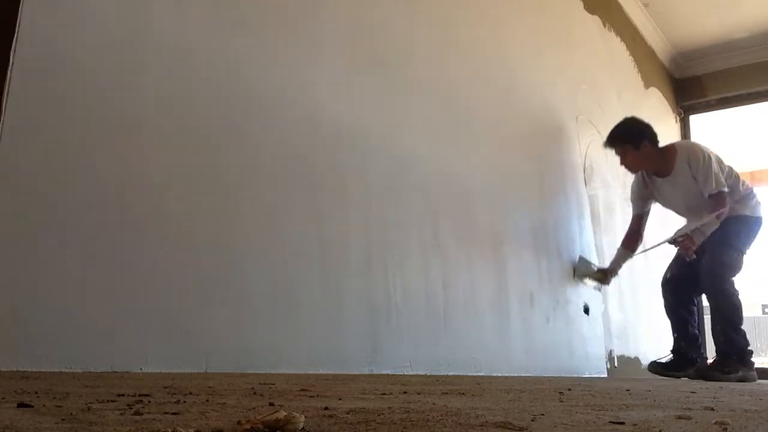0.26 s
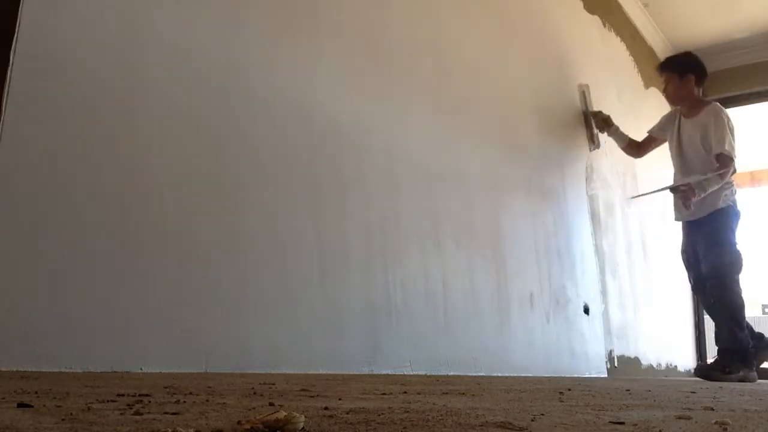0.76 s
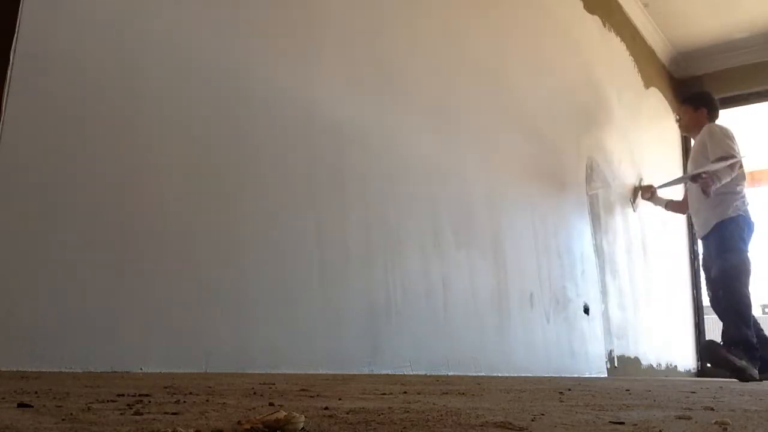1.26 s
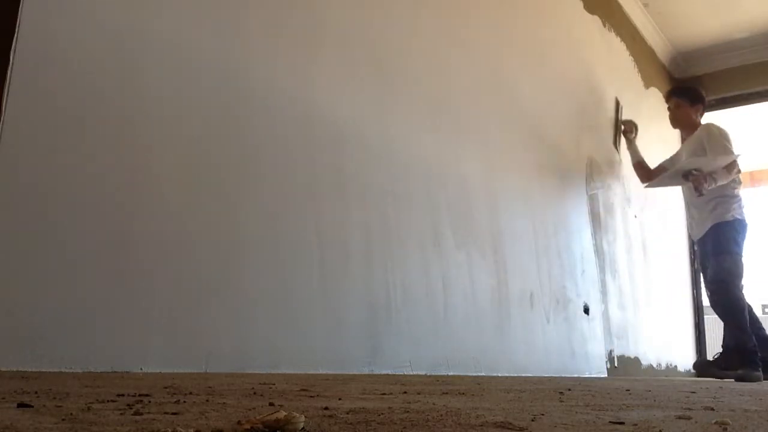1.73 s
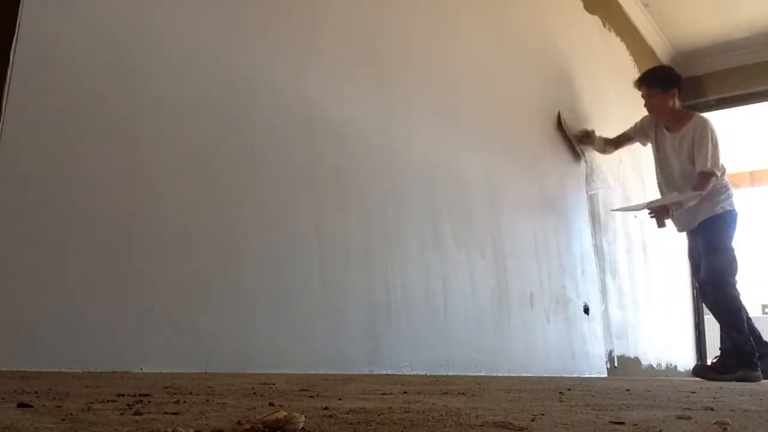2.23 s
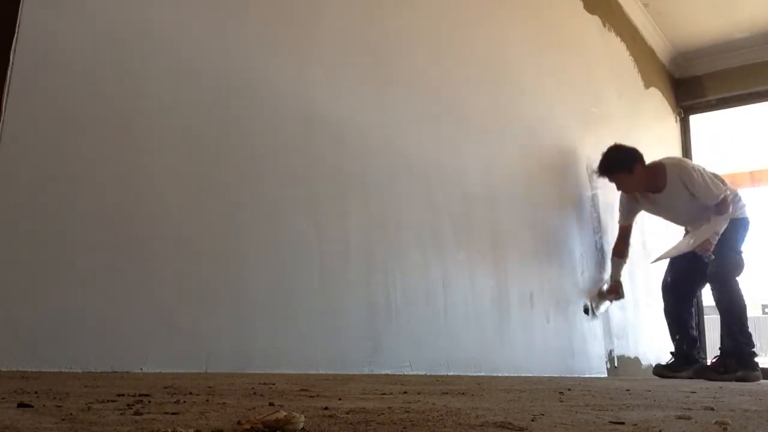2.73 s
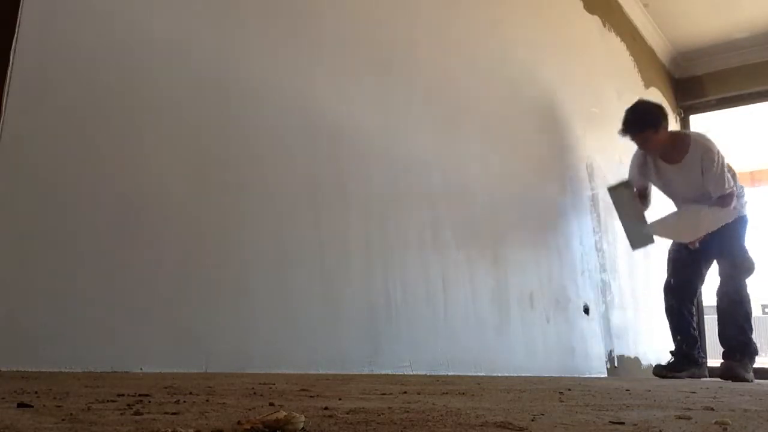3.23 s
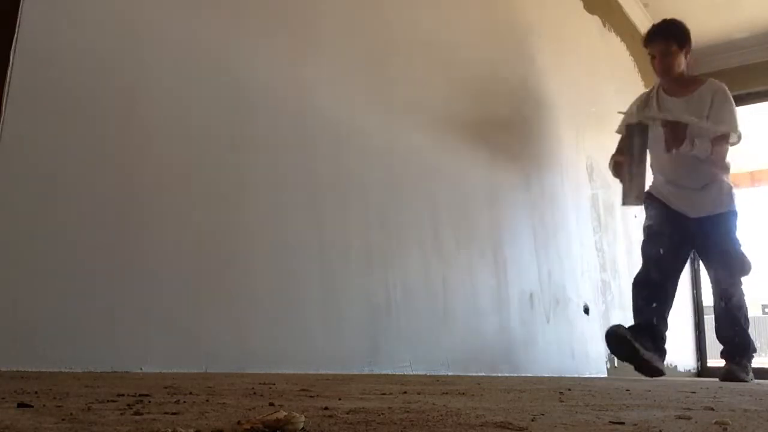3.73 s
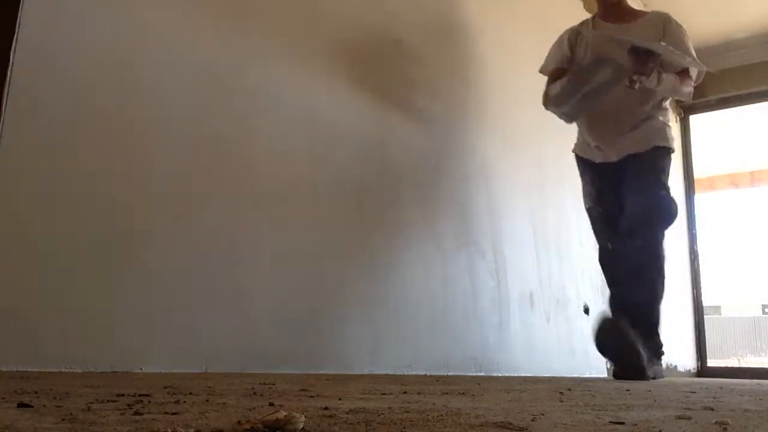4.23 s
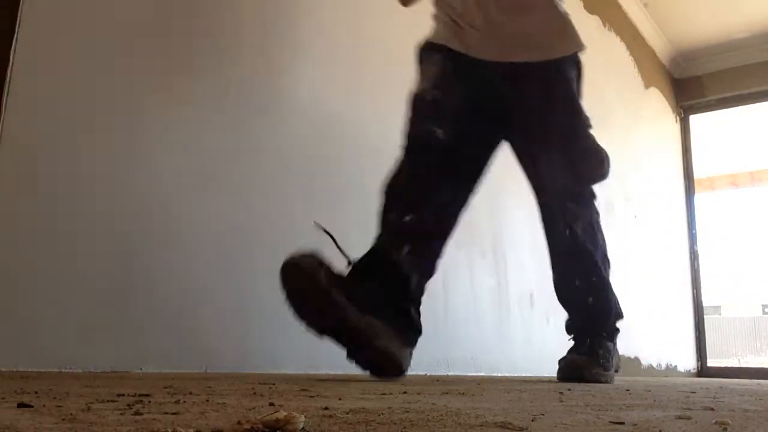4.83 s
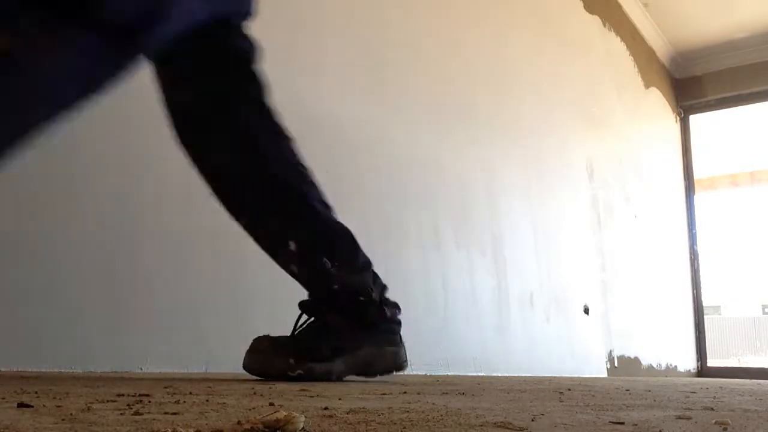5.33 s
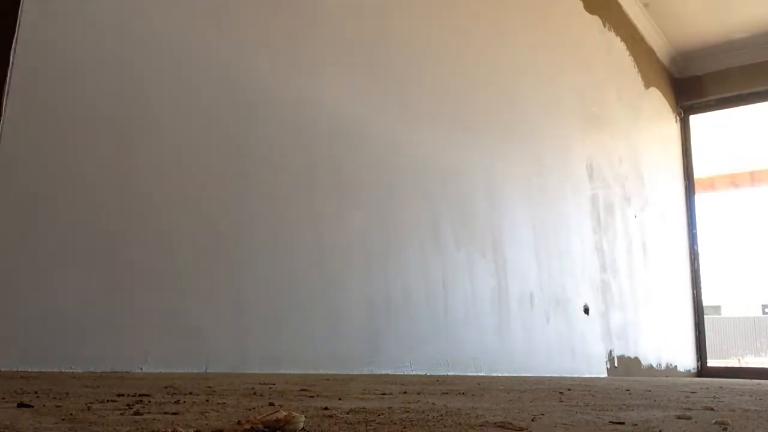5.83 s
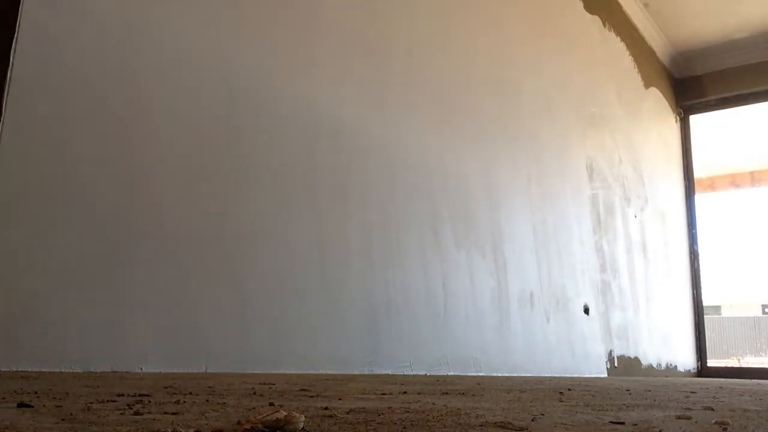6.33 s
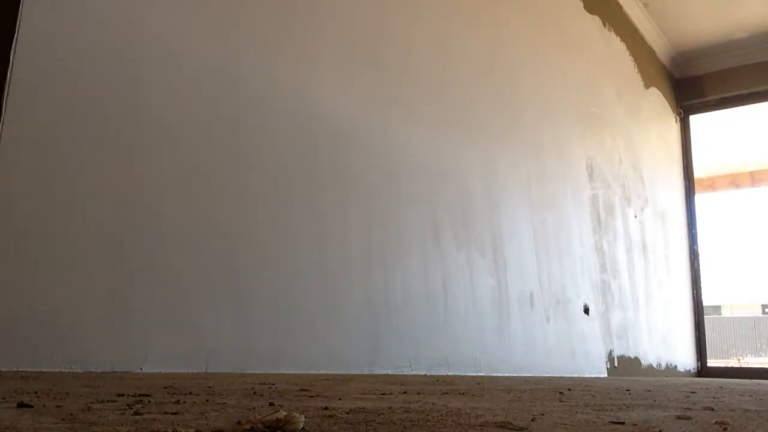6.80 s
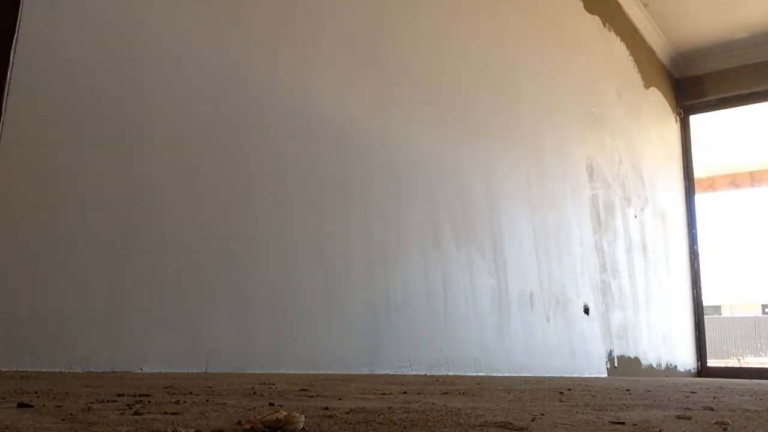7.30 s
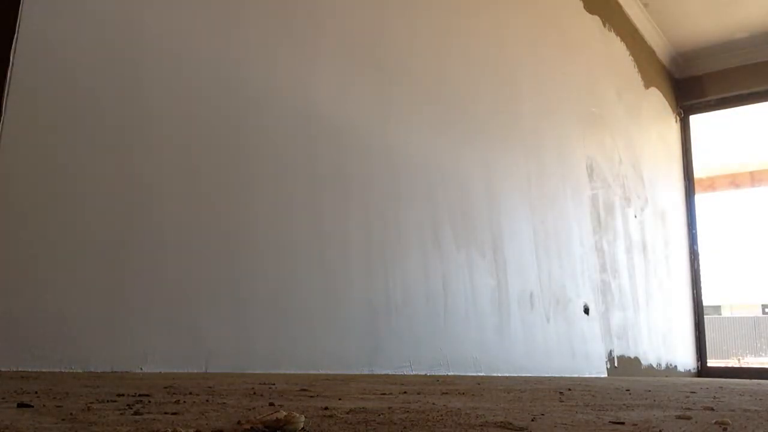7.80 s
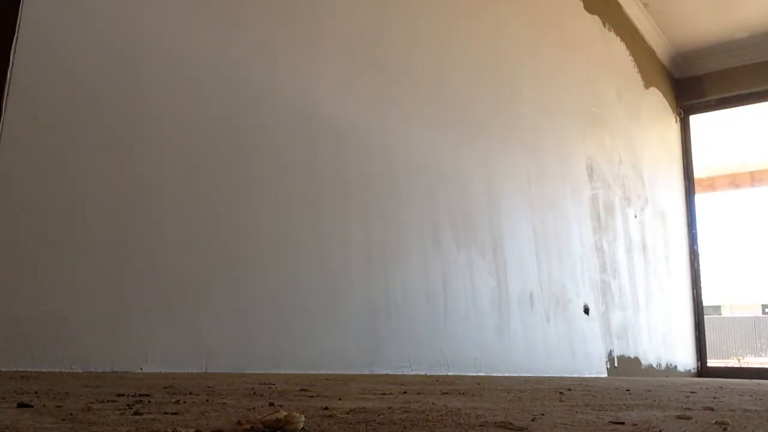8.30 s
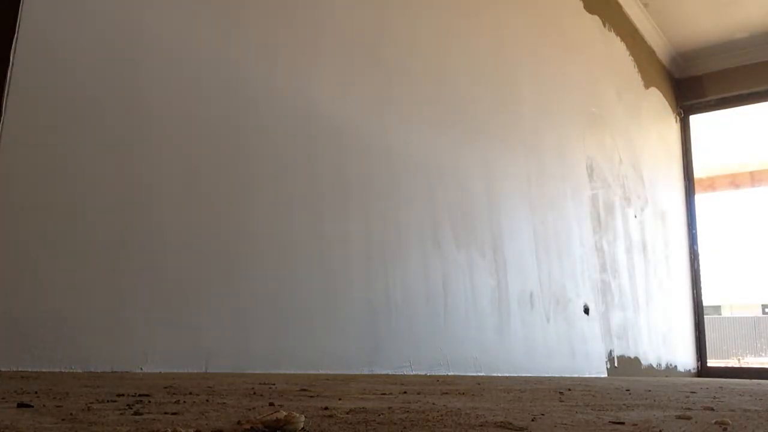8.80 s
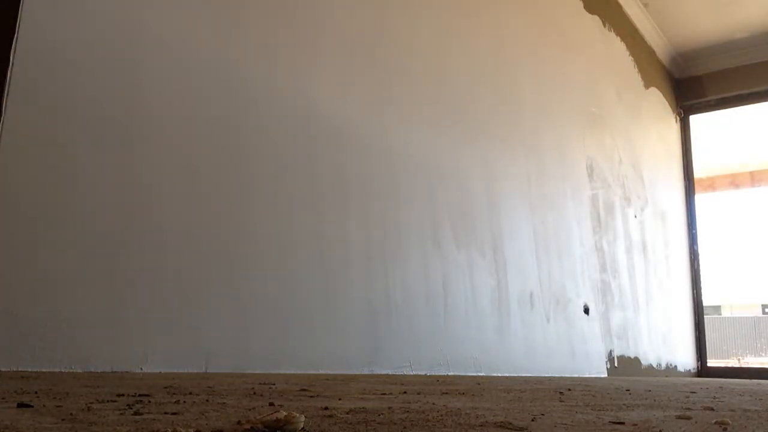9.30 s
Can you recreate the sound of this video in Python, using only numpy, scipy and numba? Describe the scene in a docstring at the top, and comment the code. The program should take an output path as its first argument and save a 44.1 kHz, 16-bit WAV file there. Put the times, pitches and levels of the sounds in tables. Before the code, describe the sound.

Gritty trowel strokes on a plastered wall give way to footsteps, scuffs and loud closing bangs, with an idling engine humming faintly behind.

```python
"""A steel trowel first spreads wet plaster in a bare room: grit, as clicks over noise, hisses and shakes the blade.
Ticks and gliding streaks of sound join the strokes; then come taps that ring a hand-held plaster board.
The plasterer walks past a phone on the floor: boots knock and scuff, and things are set down out of sight,
the hardest blows near the end. Knocks are damped resonances; scuffs are filtered grit.
Throughout, the hard walls reverberate, an idling engine throbs as a sum of sine orders, and outdoor noise drifts."""
import sys
import numpy as np
from scipy import signal
from scipy.io import wavfile
from scipy.ndimage import uniform_filter1d
from numba import njit

SR = 44100
rng = np.random.default_rng(int(sys.argv[2]) if len(sys.argv) > 2 else 0)


def put_to_file(sound):
    """Save the sound as 16-bit audio at rate SR, in the file named by the first command-line argument."""
    columns = np.atleast_2d(sound).T  # one column per channel
    safe = np.clip(columns, -1, 1)
    whole_steps = np.round(safe * 32767)
    wavfile.write(sys.argv[1], SR, whole_steps.astype(np.int16))


N = 421135

# Trowel strokes: (full_pressure_s, attack_s, hold_s, top_hiss_release_s, top_hiss_db,
# middle_hiss_over_top_db, blade_resonance_hz, blade_over_top_db)
TROWEL_STROKES = [(0.0, .1, 0.15, 0.26, -46.5, 5.5, 985, 8.5),
                  (0.303, 0.042, 0.007, 0.18, -43.5, -7.5, 990, 10),
                  (0.683, 0.44, .02, 0.3, -66, -2.5, 995, 8.5),
                  (1.029, .006, 0.0078, 0.027, -63, 13, 1000, 8),
                  (1.044, 0.26, 0.012, 0.78, -71.5, 7.5, 1080, 8),
                  (1.285, 0.17, 0.0092, 0.14, -52.5, -4.5, 970, 0),
                  (1.405, 0.22, 0.0086, 0.21, -56, -3, 810, -15),
                  (1.628, 0.088, 0.039, 0.17, -51.5, -3, 960, -8.5),
                  (1.766, 0.1, 0.089, 0.18, -40.5, -5.5, 887, 7.5),
                  (2.122, 0.29, .1, 0.27, -72, 2, 1038, 12),
                  (2.33, 0.35, 0.018, 0.14, -63.5, -5, 1010, 8.5),
                  (2.432, 0.1, 0.023, 0.16, -51, 5.5, 684, 3.5),
                  (2.537, 0.13, 0.049, 0.24, -45, 5.5, 580, 8.5),
                  (2.696, 0.28, 0.05, 0.094, -47.5, 4.5, 615, 12.5),
                  (2.843, 0.061, 0.036, 0.15, -40, -6, 760, -3.5),
                  (2.92, 0.082, 0.0084, 0.16, -33.5, -9, 755, 3.5),
                  (3.255, 0.99, 0.0085, 0.13, -63.5, 0, 830, 10),
                  (3.377, 0.065, 0.018, 0.19, -64.5, 3, 754, 2),
                  (3.564, 0.011, 0.0069, 0.054, -61, -1, 606, 10.5),
                  (3.67, 0.04, 0.0067, 0.06, -48.5, 8.5, 1120, 7.5),
                  (3.726, 0.099, 0.1, 0.18, -35.5, -3.5, 746, -3.5)]
# Modes of the steel blade: (pitch_hz, width_hz, relative_level_db)
BLADE_MODES = [(520, 230, 17), (745, 41, 12.5), (810, 56, 5.5), (904, 45, 6.5), (1026, 100, 13),
               (1160, 79, 14.5), (1326, 98, 11)]
# Narrow streaks where a scraping edge sings: (start_s, length_s, first_hz, last_hz, width_hz,
# level_before_fades_db)
SINGING_STREAKS = [(0.29, 0.36, 1194, 1160, 25, -47.5), (2.423, 0.13, 2900, 2850, 200, -49),
                   (2.635, 0.074, 1740, 2500, 250, -40), (2.693, 0.042, 2350, 2350, 200, -41),
                   (2.911, 0.057, 2600, 2400, 250, -36.5), (2.913, 0.056, 4270, 4500, 350, -39.5),
                   (2.944, 0.19, 1270, 1260, 80, -43.5), (6.271, 0.091, 1800, 2900, 900, -29),
                   (7.102, 0.016, 1800, 2000, 200, -48), (7.085, .03, 4100, 3700, 300, -55),
                   (7.15, 0.02, 2620, 2750, 200, -49), (7.344, 0.029, 2700, 2750, 248, -49.5),
                   (7.763, 0.032, 1400, 1370, 99, -50.5), (7.809, 0.18, 3760, 3620, 110, -71)]
# Heels, dull blows and one strong early echo, at 8.873 s, of the blow at 8.861 s:
# (start_s, level_db, pitch_hz, second_pitch_hz), then levels relative to level_db:
# (second_db, thud_db, crack_db, body_echo_db, clatter_echo_db)
KNOCK_EVENTS = [(3.564, -45.5, 574, 314, -9, -39, -13, 10.5, 8),
                (4.399, -35, 620, 288, 0, -9, -13, -4, -33),
                (4.923, -35.5, 480, 252, -4, -10, -25, -6, -10),
                (5.188, -45, 700, 401, -5, -27, -18, -7, -6),
                (5.446, -39.5, 416, 190, 0.5, -28, -15, -4, 1),
                (6.686, -38.5, 334, 780, -2.5, -12, -25, 1.5, -2.5),
                (6.745, -38, 530, 785, -1, -24, -18, -16, -11),
                (6.856, -21.5, 406, 676, -2, -3.5, -11.5, 4, -15),
                (7.670, -21.5, 423, 292, -1, -20, -24, -6, -15.5),
                (7.711, -36, 320, 520, 7.5, -28, -30, -15, -32),
                (8.118, -3, 660, 480, -6, -42, -17, 1.5, -4.5),
                (8.861, -9, 734, 372, -5, -7.5, -6, 1, -15.5),
                (8.873, -15, 595, 332, -4.5, -11, -14, -9, -12),
                (8.961, -14, 520, 312, -6.5, -12, -22, -3.5, -11),
                (9.258, -30, 620, 447, 0, -30, -32, -0.5, -31)]
# Steel jarred by a blow: (pitch_hz, relative_level_db, t60_s)
STEEL_MODES = [(1190, 6, .03), (2250, 0, .012), (3950, -3, .01), (5750, -10, .008), (7400, -13, .007)]
# Boots and tools dragged on the gritty floor: (full_load_s, attack_s, hold_s, top_hiss_release_s,
# top_hiss_db, middle_over_top_db, rumble_over_top_db)
FLOOR_DRAGS = [(4.403, 0.42, 0.13, 0.26, -69.5, -4, 0), (4.797, 0.33, .01, 0.16, -71, -6, -3),
               (4.963, 0.14, 0.011, 0.27, -61.5, -2, 1), (5.2, 0.43, 0.24, 0.72, -77.5, -8, 5),
               (5.213, .04, 0.013, 0.045, -65, -14, -8), (5.483, 0.0071, 0.0064, 0.089, -44, -1.5, -5.5),
               (5.523, 0.39, .01, 0.3, -55.5, -15, -5), (5.708, 0.024, 0.11, 0.05, -60, -33.5, -19),
               (5.98, 0.071, 0.064, 0.16, -57, -7, -17), (6.096, 0.31, 0.08, 0.05, -46.5, -1, -1.5),
               (6.267, 0.11, 0.065, 0.17, -33.5, -4.5, -6.5), (6.403, 0.55, 0.072, 0.053, -45.5, -2, 7),
               (6.62, 0.65, 0.01, 0.38, -59, -15, 7), (7.066, 0.44, 0.098, 0.48, -61.5, -1, 19.5),
               (7.22, 0.23, 0.046, 0.27, -48, -4, 6.5), (7.792, 0.081, 0.035, 0.51, -75, 7, 22),
               (8.567, 0.17, 0.039, 0.51, -65, -11, 11), (8.857, 0.004, 0.12, 0.16, -55.5, 7.5, 24.5),
               (9.168, 0.22, 0.0075, 0.13, -61.5, -9, 5), (9.417, 0.066, 0.0091, 0.046, -67, 4, -1),]
# Ticks of grit and steel, each with a short spray of sand: (start_s, level_db, pitch_hz)
GRIT_TICKS = [(0.8993, -51, 1790), (1.025, -46, 1290), (1.255, -45, 2960), (1.278, -35.5, 3660),
              (1.37, -34.5, 4200), (1.621, -37, 5950), (4.399, -41, 3170), (4.4188, -46, 2830),
              (4.5138, -48, 6220), (4.5224, -43, 5140), (4.734, -50, 3030), (5.1884, -41.5, 2060),
              (5.451, -38, 2330), (5.5656, -31.5, 4200), (5.777, -50, 7500), (5.803, -48, 7000),
              (5.9175, -43, 5500), (6.027, -38, 3000), (6.585, -50, 10000), (6.93, -43.5, 6000),
              (7.215, -50, 1410), (7.257, -33, 870), (7.80, -47, 6000), (8.5643, -48, 1770),
              (8.6015, -45, 2490), (8.862, -32.5, 11100), (8.932, -33, 12000), (8.934, -25, 3200),
              (8.944, -35, 7500), (8.965, -33, 12500), (8.976, -33, 8500), (8.985, -25, 4470),
              (9.409, -52, 1910)]
# Taps on the hand-held plaster board: (start_s, relative_level_db, highest_mode_boost_db)
BOARD_TAPS = [(3.67, -46, 6), (3.80, -37, 22.5), (4.676, -39, -13), (4.89, -51.5, -4)]
# Modes of the plaster board: (pitch_hz, relative_level_db, t60_s)
BOARD_MODES = [(364, -4, 0.036), (580.5, -3.5, 0.095), (1420, -29, 0.11)]
# First wall echoes, relative to a tail of unit energy: (delay_s, level_db)
WALL_ECHOES = [(.009, -5.5), (.016, -26.5), (.030, -17.5)]
# Reverberation time of the room: (frequency_hz, t60_s)
ROOM_DECAY = [(100, 0.6), (250, 1), (600, 1), (1200, 0.67), (2500, 0.69), (5000, 0.63), (8000, 0.29),
              (13000, 0.45)]
# Engine idle speed: (time_s, cycle_rate_hz)
IDLE_SPEED = [(0, 15.17), (2.2, 15.13), (4.2, 14.9), (6, 14.84), (9.55, 14.6)]
# Engine level and the swings of three orders about their means:
# (time_s, level_db, fourth_order_db, sixth_order_db, eighth_order_db)
ENGINE_LEVEL = [(0, -49, 9, -14, 0.5), (1.2, -49, 10, -18, 2), (2.3, -51, -17, -18, 4.5),
                (2.7, -51.5, -20, 14, -3), (4.2, -49.5, -15, 14, -12), (4.5, -49, 0, -4, -2),
                (5.2, -53.5, 5, -3, 1), (5.8, -52.5, -10, 0, -3), (7.5, -52.5, 10, -12, -3),
                (9.55, -58.5, 8, 0, 10.5)]
# Exhaust harmonics of the engine cycle: (order_number, relative_level_db)
EXHAUST_ORDERS = [(4, -16.5), (5, -13.5), (6, -13.5), (7, 0), (8, -4), (9, -12.5), (11, -18.5), (12, -4),
                  (14, -15), (16, -16), (20, -16.5), (24, -18.5), (25, -18.5), (29, -17)]
# Spectrum of the outdoor air and traffic: (frequency_hz, relative_density_db_per_hz)
OUTDOOR_SPECTRUM = [(30, 1), (60, -1.5), (130, -4.5), (270, -4.5), (400, -8), (800, -12.5), (1400, -44.5),
                    (4000, -60), (12000, -35), (15000, -54)]

FADE_DB = 30  # level change over an attack or a release
# Releases as multiples of the top hiss's: middle trowel hiss, blade, middle and rumble of the floor
LINGER_MIDDLE, LINGER_BLADE, LINGER_FLOOR = 1.51, 1, 1.36
BLADE_WIDTH_HZ = 340  # span of the modes that a grip lets speak
UPPER_MODES_DB = -9
THUD_HZ, SPRAY_DB, OUTDOOR_DB = 168, -12.5, -58
TOP_HZ = 15520  # upper limit of the phone's band


def trowel():
    """Friction excites forced vibration: grit hisses and shakes the blade; grip and load select its modes."""
    top_db, middle_db, stroke_hz, blade_db = np.transpose(TROWEL_STROKES)[4:]
    blade_power = swell(TROWEL_STROKES, top_db + blade_db, LINGER_BLADE) + 1e-30  # avoids 0 / 0
    # Mean resonance of overlapping strokes, weighted by power
    grip_hz = (gain(blade_power * stroke_hz[:, None]) / gain(blade_power)) ** 2

    sand = grit(rate=2500, scatter_db=3.0, paste_db=-0.1)
    top = level(between(sand, 4200, 14500))
    middle = level(between(sand, 1300, 4200))
    contact = undb(-12.0) * wandering(sand, 2400, 370)
    middle = level(middle + contact + undb(-4) * pebbles(120, 1270, 5050))
    top_gain = gain(swell(TROWEL_STROKES, top_db))
    middle_gain = gain(swell(TROWEL_STROKES, top_db + middle_db, LINGER_MIDDLE))
    hiss = top_gain * top - middle_gain * middle

    modes = level(sum(level(band(sand, hz, width_hz), db) * undb(4.6 * walk(14))
                      for hz, width_hz, db in BLADE_MODES))
    modes = modes + level(between(sand, 250, 1170), -5.5)
    gripped = level(svf(svf(modes, grip_hz, BLADE_WIDTH_HZ), grip_hz, 3 * BLADE_WIDTH_HZ))
    blade = gripped + undb(UPPER_MODES_DB) * level(band(modes, 1286, 240))
    return hiss, gain(blade_power) * blade


def streaks():
    """Resonant filtering: hiss passed through a narrow gliding resonance sings at its centre frequency."""
    out = np.zeros(N)
    for s, length_s, first_hz, last_hz, width_hz, db in SINGING_STREAKS:
        progress = np.linspace(0, 1, int(length_s * SR))
        hz = first_hz + (last_hz - first_hz) * progress
        tone = level(svf(rng.standard_normal(len(progress)), hz, 1. * width_hz), db)
        add(out, s, tone * np.minimum(6 * progress, 1) * (1 - progress) ** .5)
    return out


def knocks():
    """Impulse response: each event sums two damped resonances, a slower thud, a crack and jarred steel."""
    out, sent = np.zeros(N), np.zeros(N)  # direct sound, and the share sent to the walls
    t = np.arange(SR // 10) / SR
    thud = blow(THUD_HZ, 0.68) + 0.15 * blow(65, 1.5)
    steel = sum(undb(mode_db - 60 * t / t60) * np.sin(2 * np.pi * hz * t)
                for hz, mode_db, t60 in STEEL_MODES)
    # Bright edge of a hard blow
    clatter = blow(1210, 2.02) + 0.41 * blow(4800, 2.0) + undb(-25) * steel
    for s, db, hz, second_hz, second_db, thud_db, crack_db, echo_db, clatter_db in KNOCK_EVENTS:
        body = blow(hz, 0.86) + undb(second_db) * blow(second_hz, 0.88) + undb(thud_db) * thud
        crack = undb(crack_db) * blow(1980, 0.74)
        rattle = between(rng.standard_normal(len(t)), 1500, 7100) * np.exp(-t / 0.0064)
        bright = undb(clatter_db - 19.5) * rattle + undb(clatter_db - 12) * steel
        add(out, s, undb(db) * (body + crack + bright))
        add(sent, s, undb(db) * (undb(echo_db) * body + undb(clatter_db) * clatter))
    return out, sent


def scuffs():
    """Dry friction: coarser grit hisses under soles and tools, and the loaded floor rumbles."""
    top_db, middle_db, rumble_db = np.transpose(FLOOR_DRAGS)[4:]
    sand = grit(rate=1400, scatter_db=3.3, paste_db=1)
    top = level(between(sand, 4000, 11500))
    middle = level(between(sand, 1200, 4000))
    rumble = level(between(sand, 300, 860))
    contact = undb(3) * wandering(sand, 2660, 700)
    middle = level(middle + contact + undb(1) * pebbles(90, 1104, 5020))
    top_gain = gain(swell(FLOOR_DRAGS, top_db))
    middle_gain = gain(swell(FLOOR_DRAGS, top_db + middle_db, LINGER_FLOOR))
    rumble_gain = gain(swell(FLOOR_DRAGS, top_db + rumble_db, LINGER_FLOOR))
    return top_gain * top - middle_gain * middle + rumble_gain * rumble


def ticks():
    """Heavily damped impact: three resonances click for a cycle or two, with a decaying spray of sand."""
    out, t = np.zeros(N), np.arange(SR // 10) / SR
    for s, db, hz in GRIT_TICKS:
        spray = level(between(rng.standard_normal(len(t)), 630, 6500), SPRAY_DB) * np.exp(-t / 0.0087)
        upper = 0.21 * blow(min(1.7 * hz, TOP_HZ), 0.81)
        lower = 0.53 * blow(0.67 * hz, 0.68)
        add(out, s, undb(db) * (blow(hz, 0.66) + upper + lower + spray))
    return out


def board():
    """Modal vibration: soft taps ring the thin board, whose modes die away under the damping hand."""
    out, t = np.zeros(N), np.arange(SR // 2) / SR
    for s, db, high_db in BOARD_TAPS:
        ring = sum(undb(mode_db + (hz > 1000) * high_db - 60 * t / t60) * np.sin(2 * np.pi * hz * t)
                   for hz, mode_db, t60 in BOARD_MODES)
        soft_onset = 1 - np.exp(-t / 0.016)
        add(out, s, undb(db + 17.0) * ring * soft_onset)
    return out


def room(x):
    """Reverberation: first echoes, then a dense tail of bare walls, each band dying at its own rate."""
    t = np.arange(int(1.4 * SR)) / SR
    hz, t60 = np.transpose(ROOM_DECAY)
    noise = rng.standard_normal(len(t))
    tail = 0
    for f in 60 * 2 ** np.arange(0, 8.4, 2 / 3):
        decay_s = np.interp(np.log(f), np.log(hz), t60)
        tail = tail + band(noise, f, f / 2) * undb(-60 * t / decay_s)
    tail *= np.clip((t - .004) / .012, 0, 1)  # echoes thicken over the first crossings
    tail /= np.sqrt(np.sum(tail ** 2))
    for s, db in WALL_ECHOES:
        tail[int(s * SR)] += undb(db)
    return signal.fftconvolve(x, tail)[:N]


def engine():
    """Beating of harmonics: neighbouring orders of the slow cycle throb, and each wavers on its own."""
    cycles = np.cumsum(curves(IDLE_SPEED)[0]) / SR
    db, *swings_db = curves(ENGINE_LEVEL)
    swing_db = dict(zip((4, 6, 8), swings_db))
    out = 0
    for order, order_db in EXHAUST_ORDERS:
        strength = undb(order_db + 1.3 * walk(1.5) + swing_db.get(order, 0))
        waver_rad = .05 * order * walk(1.5)
        start_rad = 2 * np.pi * rng.random()
        out = out + strength * np.sin(2 * np.pi * order * cycles + waver_rad + start_rad)
    return undb(db) * out


def outside():
    """Broadband noise: steady air and far traffic through the open door, each band swelling a little."""
    hz, density_db = np.transpose(OUTDOOR_SPECTRUM)
    out = 0
    for f in 35 * 2 ** np.arange(0, 9, .5):
        band_db = np.interp(np.log(f), np.log(hz), density_db) + 0.5 * walk(1.6)
        out = out + undb(band_db) * band(rng.standard_normal(N), f, f / 4.1)
    return level(out, OUTDOOR_DB)


def grit(rate, scatter_db, paste_db):
    """Random impulses: grains catch as clicks of uneven size over the smooth hiss of the paste."""
    size_db = scatter_db * np.minimum(rng.exponential(size=N), 4)
    clicks = (rng.random(N) < rate / SR) * rng.choice([-1, 1], N) * undb(size_db)
    paste = level(rng.standard_normal(N), paste_db)
    return level(level(clicks) + paste) * undb(1.1 * walk(60))


def pebbles(rate, lo_hz, hi_hz):
    """Transient ringing: coarser grains roll with short rings of any pitch that slide a little."""
    out, t = np.zeros(N), np.arange(SR // 50) / SR
    for when, pitch, softness, slide in rng.random((int(rate * N / SR), 4)):
        hz = lo_hz * (hi_hz / lo_hz) ** pitch
        ring = np.sin(2 * np.pi * hz * t * (1 + 8 * (slide - .5) * t))
        add(out, when * N / SR, undb(-14 * softness) * ring * t * np.exp(-t / 0.0024))
    return level(out)


def wandering(sand, hz, width_hz):
    """Contact resonance: its frequency drifts as the edge tilts, and its level wavers."""
    centre_hz = hz * 2 ** (0.27 * walk(6))
    return level(svf(sand, centre_hz, 1. * width_hz)) * undb(5.7 * walk(19))


def blow(hz, share):
    """Damped resonance with steep skirts: one push gives a few cycles, peak 1; share is width over hz."""
    y = 1. * (np.arange(SR // 10) == 0)
    for _ in range(4):
        y = band(y, hz, share * hz)
    return -y / np.abs(y).max()


def swell(table, db, linger=1):
    """Power envelope: each drag rises in dB over the attack, holds, and fades over the release."""
    s, attack, hold, release = np.transpose(table)[:4, :, None]
    t = np.arange(0, N + 64, 64) / SR  # one point every 64 samples
    fade = np.maximum((s - t) / attack, np.maximum(t - s - hold, 0) / (release * linger))
    return undb(2 * (db[:, None] - FADE_DB * fade))


def gain(power):
    """Incoherent addition: powers of overlapping drags add; their root is the gain at every sample."""
    return np.interp(np.arange(N) / 64, np.arange(power.shape[1]), np.sqrt(power.sum(axis=0)))


def walk(rate):
    """Random modulation: values held 1 / rate seconds and slewed twice, with a spread near 1."""
    k = int(SR / rate)
    steps = np.repeat(rng.standard_normal(N // k + 1), k)
    return 1.296 * uniform_filter1d(uniform_filter1d(steps, k), k)[:N]


@njit
def svf(x, hz, width):
    """Second-order resonance: a state-variable band-pass, gain 1 at a centre that may move."""
    y, b, l = np.empty(len(x)), 0., 0.
    for i in range(len(x)):
        g, k = np.tan(np.pi * hz[i] / SR), width / hz[i]
        v = (b + g * (x[i] - l)) / (1 + g * (g + k))
        b, l, y[i] = 2 * v - b, l + 2 * g * v, k * v
    return y


def band(x, hz, width_hz):
    """Fixed resonance: band-pass with a constant centre."""
    return svf(x, np.full(len(x), 1. * hz), 1. * width_hz)


def between(x, lo_hz, hi_hz):
    """Band limiting: Butterworth band-pass between two edges."""
    return signal.sosfilt(signal.butter(2, [lo_hz, hi_hz], "band", fs=SR, output="sos"), x)


def undb(db):
    """Decibel law: amplitude ratio of a level in dB."""
    return 10 ** (np.asarray(db) / 20)


def level(x, db=0):
    """Root-mean-square level: scale a signal to db."""
    return x * undb(db) / np.sqrt(np.mean(x ** 2))


def curves(table):
    """Linear interpolation: columns of a table at every sample."""
    s, *columns = np.transpose(table)
    return [np.interp(np.arange(N) / SR, s, c) for c in columns]


def add(out, s, sound):
    """Superposition: add a sound from time s onward."""
    i = int(s * SR)
    out[i:i + len(sound)] += sound[:N - i]


def scene():
    """Superposition of direct sounds, their reverberation and the background."""
    hiss, blade = trowel()
    blows, echoed = knocks()
    feet, clicks, rings = scuffs(), ticks() + streaks(), board()
    # Each source drives the room by its own share
    sent = undb(-14.5) * hiss + undb(-9.5) * blade + undb(-15.5) * feet
    sent = sent + echoed + undb(-12.5) * clicks + undb(-7.0) * rings
    direct = hiss + blade + feet + blows + clicks + rings
    return (direct + room(sent) + engine() + outside())[None]


def record(dry):
    """Band limiting: the phone drops the deepest bass and cuts the top."""
    thin = signal.sosfilt(signal.butter(2, 45, "high", fs=SR, output="sos"), dry)
    return signal.sosfilt(signal.ellip(14, .2, 70, TOP_HZ, fs=SR, output="sos"), thin)


dry = scene()
out = record(dry)
put_to_file(out)
```